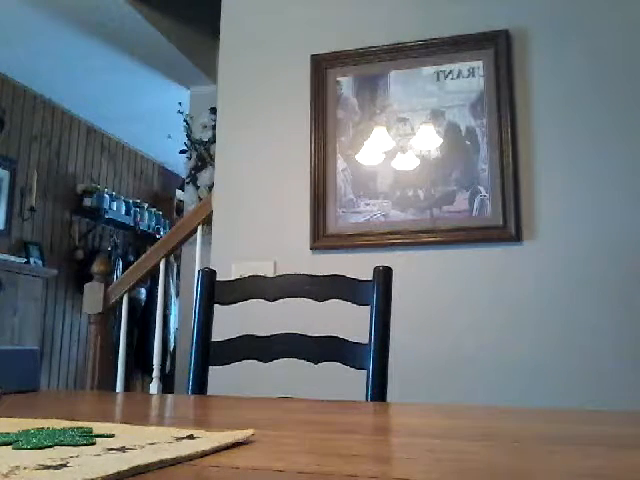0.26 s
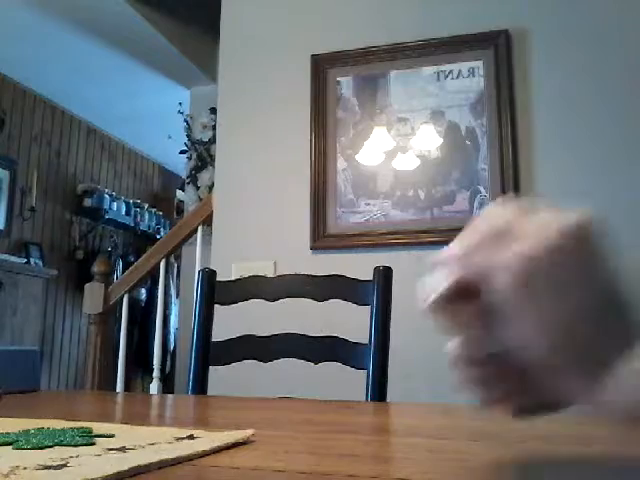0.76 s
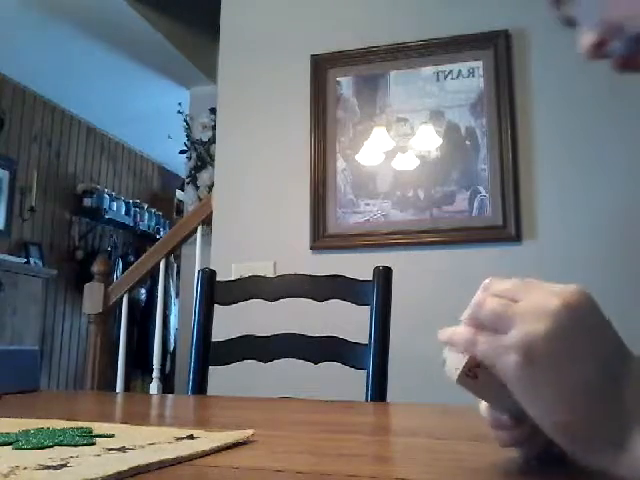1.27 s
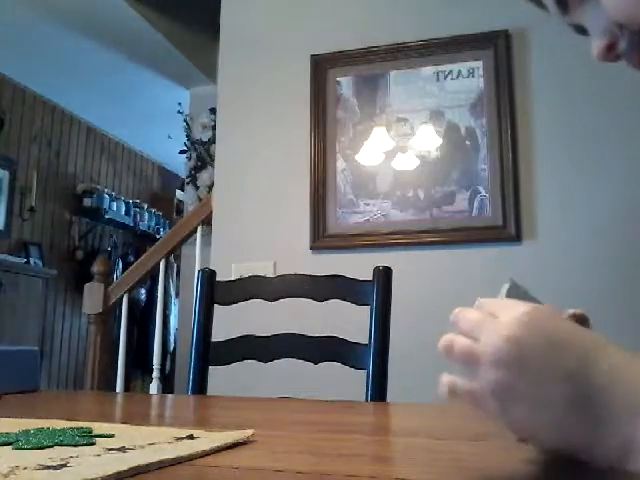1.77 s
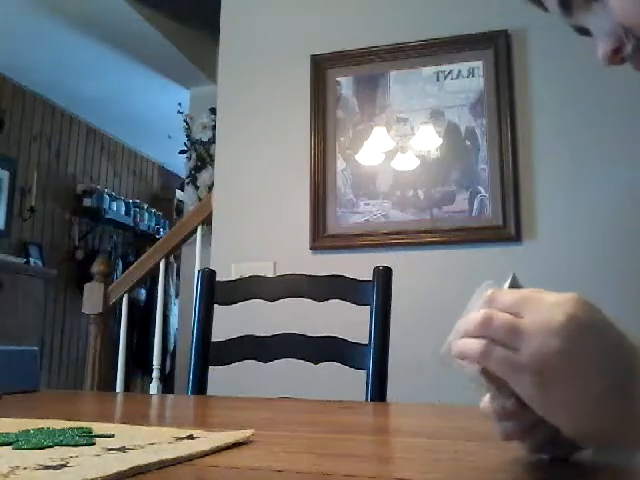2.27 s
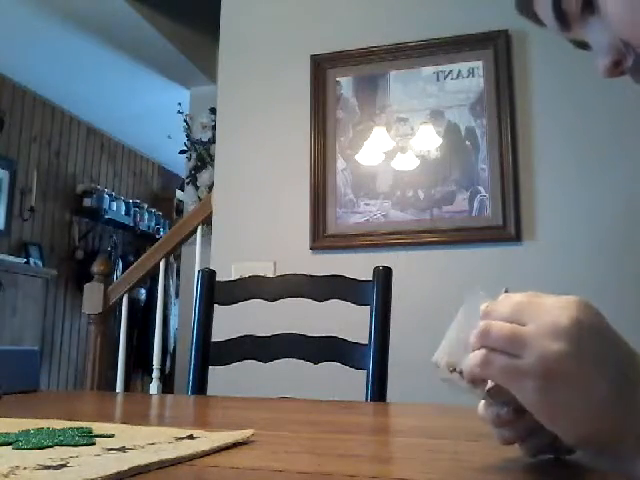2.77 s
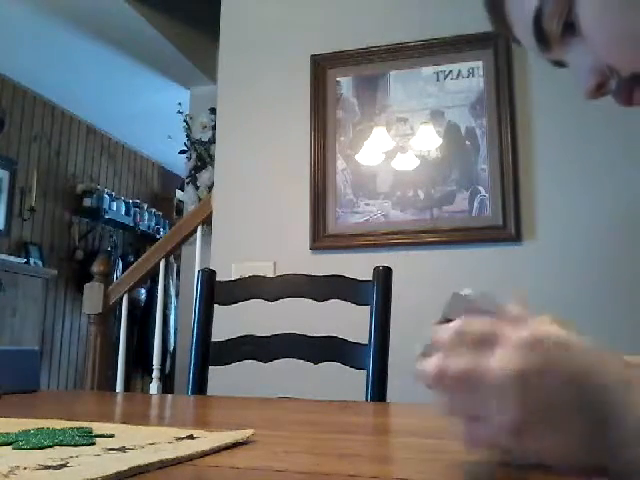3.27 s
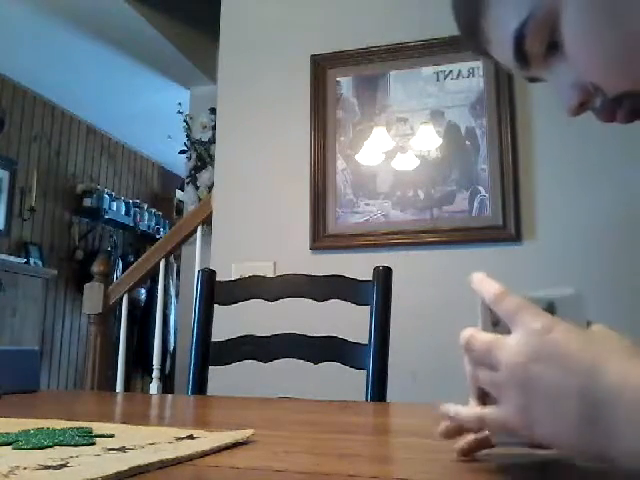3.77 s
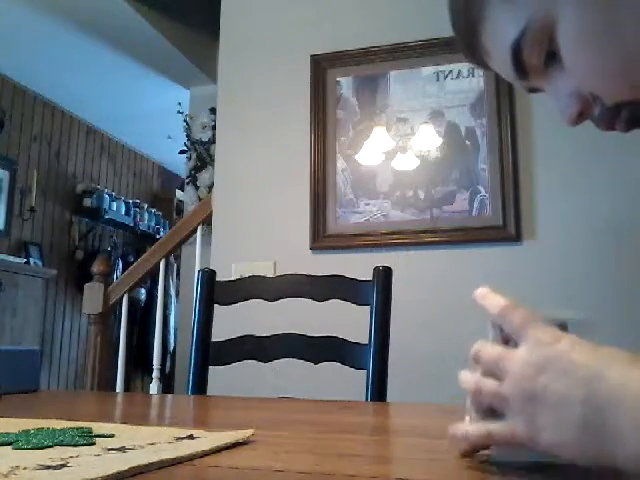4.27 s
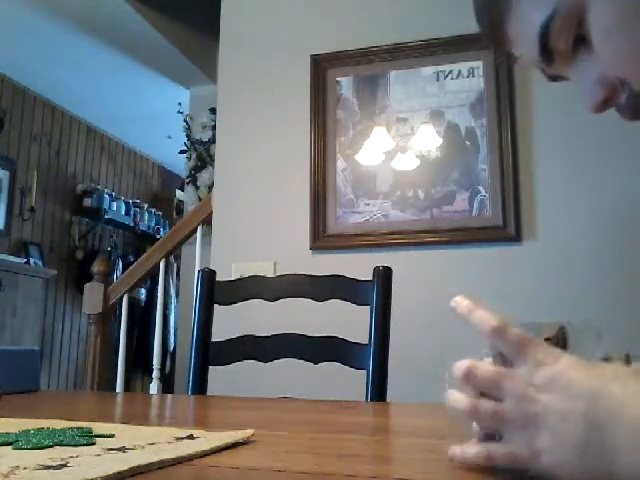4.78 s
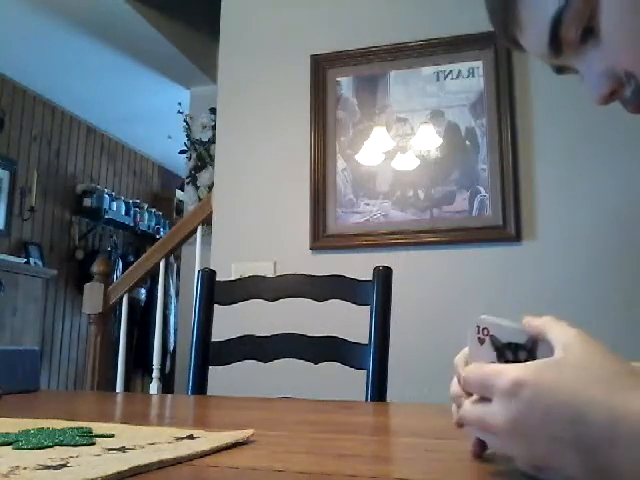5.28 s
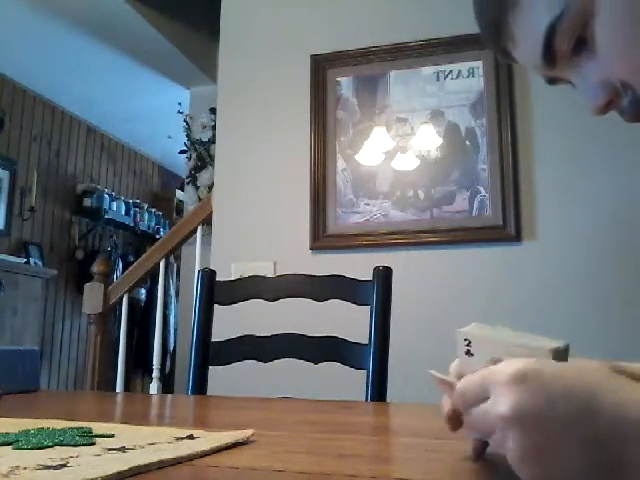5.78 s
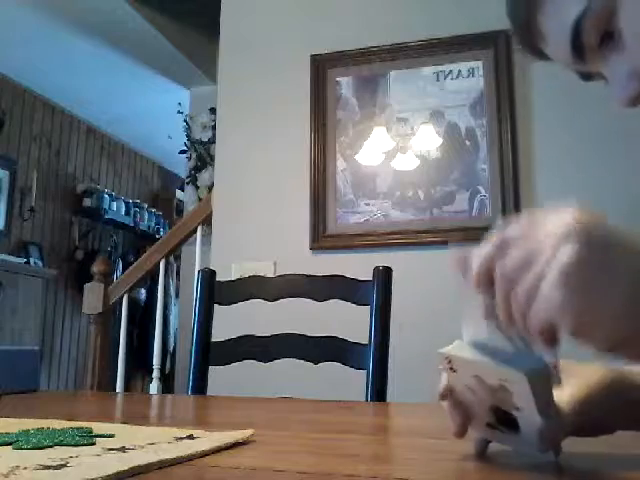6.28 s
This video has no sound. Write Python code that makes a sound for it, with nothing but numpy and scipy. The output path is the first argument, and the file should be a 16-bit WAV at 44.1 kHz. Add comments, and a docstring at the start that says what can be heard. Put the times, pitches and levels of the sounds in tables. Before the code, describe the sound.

Close, dry card handling at a wooden table indoors: scattered light ticks, a low soft bump with friction hiss, then a fast riffle swelling to sharp bright snaps. Brief papery swishes follow, then a few edge taps and two loud clattering knocks with woody ring as the deck is squared. It ends almost silent, with slight room reverberation, low mains hum and microphone hiss.

```python
"""Cards flick off a thumb in quick runs, each slapping the pile a moment later; at a wooden table in a quiet room
forearms land, cards slide and swish, and the deck is tapped square and briefly rubbed on the wood.
Flicks, taps and thumps are short bursts and pushes through resonances; slides and swishes are coloured noise
with moving levels. The room answers in decaying noise; a mains hum and the microphone's hiss lie under it all."""
import sys
import numpy as np
from scipy import signal
from scipy.fft import rfft, irfft, next_fast_len
from scipy.io import wavfile
from scipy.ndimage import map_coordinates

SR = 44100
rng = np.random.default_rng(int(sys.argv[2]) if len(sys.argv) > 2 else 0)


def file_out(sig):
    """Save sig as 16-bit WAV at sys.argv[1]."""
    # one column per channel
    cols = np.atleast_2d(sig).T
    # limit, then scale
    lim = np.clip(cols, -1, 1)
    pcm = np.round(lim * 32767).astype(np.int16)
    wavfile.write(sys.argv[1], SR, pcm)


N = 287973

# resonances of the table top: (f/Hz, width/Hz, level/dB)
TABLE_MODES = [(117, 18, -9), (201, 34, 0), (259.8, 57, -3), (367, 49, 1), (483, 20, -6.5), (656, 36, 5),
               (900, 33, -32.5)]


def amp(db):
    """Decibels to a linear factor."""
    return 10 ** (np.asarray(db) / 20)


def unit(x):
    """Scales to an rms of 1."""
    return x / np.sqrt(np.mean(x ** 2) + 1e-20)


def peaked(x):
    """Scales to a peak of 1."""
    return x / (np.max(np.abs(x)) + 1e-20)


def along(points, hz):
    """Reads a curve of (f/Hz, value) points on a log frequency axis."""
    f, v = np.transpose(points)
    return np.interp(np.log(hz + 1), np.log(f + 1), v)


def curves(rows):
    """One value per sample for each column after the time."""
    s, *cols = np.transpose(rows)
    return [np.interp(np.arange(N) / SR, s, c) for c in cols]


def wobble(rate):
    """A smooth random curve, rate knots a second."""
    knots = rng.standard_normal(int(N * rate / SR) + 4)
    return map_coordinates(knots, [np.arange(N) * rate / SR])


def filtered(x, response):
    """Applies a complex response of frequency."""
    n = x.shape[-1]
    m = next_fast_len(n + SR // 4)
    return irfft(rfft(x, m) * response(np.fft.rfftfreq(m, 1 / SR)), m)[..., :n]


def modes(rows):
    """Causal response of resonances (f/Hz, width/Hz, level/dB), with alternating signs."""
    def response(f):
        total = 0
        for k, (centre, width, db) in enumerate(rows):
            damping = 1j * f * width
            total = total + (-1) ** k * amp(db) * damping / (centre * centre - f * f + damping)
        return total
    return response


def causal(gain):
    """The same gain with no ringing before the blow (folded cepstrum)."""
    def response(hz):
        cep = irfft(np.log(gain(hz) + 1e-6))
        half = len(cep) // 2
        cep[1:half] *= 2
        cep[half + 1:] = 0
        return np.exp(rfft(cep))
    return response


def noise(colour):
    """Steady noise shaped by (f/Hz, level/dB) points, at an rms of 1."""
    return unit(filtered(rng.standard_normal(N), lambda hz: amp(along(colour, hz))))


def add(track, s, sound):
    """Mixes a sound in at s seconds."""
    track[round(s * SR):][:len(sound)] += sound


def snap(t, hz, body_db):
    """A freed card edge slips with a quickly dying tone and chatter, over a broader, lower body."""
    chatter = rng.standard_normal(len(t)) * (t / 0.00013) * amp(-60 * t / 0.0057)
    tone = amp(-60 * t / 0.0022) * np.cos(2 * np.pi * hz * t)
    edge = modes([(hz, 1600, 0), (2700, 1500, -8), (12500, 3000, -18), (6200, 400, -6)])
    ring = peaked(filtered(2.6 * tone + 0.4 * chatter, edge))
    burst = rng.standard_normal(len(t)) * amp(-60 * t / 0.015)
    body = peaked(filtered(burst, modes([(1620, 1500, 0), (500, 400, 0.0013)])))
    return ring + amp(body_db) * body


def slap(t, leak_hz=150):
    """A card landing on the pile pushes out the trapped air and cracks brightly."""
    push = (t / 0.00029) * np.exp(-t / 0.00051)
    # a small card radiates no deep bass
    push = filtered(push, lambda f: (1j * f / (leak_hz + 1j * f)) ** 2)
    burst = rng.standard_normal(len(t)) * amp(-60 * t / 0.0025)
    crack = peaked(filtered(burst, modes([(5500, 3600, 0)])))
    return peaked(push) + 1.2 * crack


def flicks(lead_s=0.0008, fall_s=0.0075):
    """Each ring starts lead_s after its listed time; the card slaps the pile fall_s later."""
    # cards leaving the thumb: (t/s, ring level/dB, ring f/Hz)
    releases = [(0.0074, -48.5, 5350), (0.0538, -43.5, 6000), (0.0987, -41.5, 5700), (0.1261, -41, 5630),
                (0.168, -36, 6100), (0.2174, -37, 5970), (0.2698, -49, 5240), (0.3227, -39.5, 5500),
                (0.4219, -46, 4840), (0.4663, -47, 5700), (0.5172, -37, 6100), (0.6669, -40, 5530),
                (0.7108, -45.5, 4350), (0.7322, -43, 6350), (0.8096, -38.5, 4570), (0.8944, -39.5, 5770),
                (0.9284, -40, 5920), (0.9642, -27.5, 6000), (1.0131, -30.5, 5930), (1.2017, -41, 5930),
                (1.2271, -35.5, 6500), (1.2935, -36.5, 6530), (1.3404, -35, 6260), (1.3887, -45, 6100),
                (1.4092, -39.5, 6240), (1.4314, -45, 6300), (2.0153, -46, 5730), (2.0787, -51, 5660),
                (2.1286, -47, 6300), (2.171, -38, 5300), (2.1914, -49, 6740), (2.2069, -46.5, 5160),
                (2.2423, -46.5, 5900), (2.2957, -41, 6200), (2.3341, -41, 6040), (2.3655, -46, 7570),
                (2.3875, -46, 6800), (2.4044, -41, 6200), (2.4184, -43, 5960), (2.4374, -39, 6000),
                (2.4498, -40, 6000), (2.4628, -35.5, 6040), (2.4743, -36, 5610), (2.4992, -37.5, 6300),
                (2.5386, -36.5, 6400), (2.5676, -35.5, 6040), (2.5945, -30.5, 5870), (2.6184, -29, 6150),
                (2.6454, -30, 5940), (2.6788, -24, 6300), (2.7267, -22.5, 6150), (2.7736, -26, 6270),
                (2.8, -26, 5860), (2.818, -24, 5930), (2.8429, -22, 7300), (2.8739, -17.5, 6400),
                (2.9063, -11.5, 6610), (2.9342, -9, 6830), (2.9512, -3.5, 6350), (2.9584, -2.5, 6750),
                (2.9614, -11, 6410), (2.9644, -5, 6050)]
    # fuller when the deck is near the table: (t/s, body level/dB re ring, slap level/dB re ring)
    fullness = [(0.1, -23, -23), (0.6, -19, -12.5), (0.9, -1, -9), (1.25, -14.5, -17), (2.05, -6.5, -20),
                (2.3, -14, -24.5), (2.6, -10.5, -16.5), (2.73, -15.5, -20), (2.83, -4.5, -7.5),
                (2.945, -16.5, -14), (2.965, -9, -26)]
    out, t = np.zeros(N + SR), np.arange(SR // 20) / SR
    bodies_db, slaps_db = curves(fullness)
    for s, db, hz in releases:
        body_db, slap_db = bodies_db[round(s * SR)], slaps_db[round(s * SR)]
        add(out, s + lead_s, amp(db) * snap(t, hz, body_db))
        add(out, s + lead_s + fall_s, amp(db + slap_db) * slap(t))
    return out[:N]


def taps():
    """Rough bursts of contact, mostly quick rattles of card edges, with the table top ringing under them."""
    # deck edges on wood, and a short rub at 5.33 to 5.43 s:
    # (t/s, peak level/dB, full-strength length/ms, tilt/dB per octave, table drive/dB)
    blows = [(3.826, -43, 3.2, 1.5, 11), (4.015, -24.5, 6.3, -4.5, 1), (4.019, -15, 5.3, -1, 10.5),
             (4.158, -24.5, 0.88, -2.5, 4), (4.1813, -22, 0.33, 5, 4), (4.186, -37, 1.3, -3, 3.5),
             (4.467, -47, 1.6, -10.5, 6.5), (4.664, -9.5, 11.8, 1.5, 6), (4.677, -10, 5.47, -1, 9.5),
             (4.694, -27.5, 1.5, -7.5, -5), (4.735, -12, 5.5, 3, 11), (4.741, -21.5, 10.3, -5, 5.5),
             (4.7963, -22, 0.41, 0.6, 8.5), (4.803, -22.5, 1, -4.5, -7), (5.2, -35.5, 2.93, -8, 9),
             (5.332, -51.5, 20, -7, 8), (5.351, -48, 32, -7, 8.5), (5.39, -53.5, 40, -9, 11),
             (5.606, -51.5, 2.6, -3.5, 7)]
    # colour of the contact: (f/Hz, level/dB)
    contact_colour = [(30, -43.5), (130, -16), (250, -1), (480, 1.5), (700, 2.5), (1500, 2), (5200, 1),
                      (6800, -7), (7800, -32), (15000, -55)]
    out, t = np.zeros(N + SR), np.arange(SR // 4) / SR
    for s, db, length_ms, tilt_db, wood_db in blows:
        over = np.maximum(t - length_ms / 1000, 0)
        grains = np.sign(rng.standard_normal(len(t))) * amp(4 * rng.standard_normal(len(t)))
        burst = grains * amp(-60 * over / 0.005)
        contact = filtered(burst, causal(lambda hz: amp(along(contact_colour, hz))))
        edges = filtered(contact, causal(lambda hz: amp(tilt_db * np.log2((hz + 100) / 1000))))
        wood = amp(wood_db) * filtered(contact, modes(TABLE_MODES))
        add(out, s, amp(db) * peaked(edges + wood))
    return out[:N]


def thumps():
    """A soft push of flesh rings the table's low modes and sways its frame at 42 Hz."""
    # forearms and wrists settling on the table: (t/s, level/dB of the ringing peak)
    landings = [(0.797, -25.5), (0.818, -29), (0.839, -32.5), (0.854, -37), (0.883, -37.5), (0.99, -34.5),
                (1.017, -43), (1.041, -30.5), (1.405, -50.5), (1.838, -55), (3.812, -51), (4.173, -44),
                (4.361, -58)]
    out, t = np.zeros(N + SR), np.arange(SR // 2) / SR
    for s, db in landings:
        push = (t / 0.0008) ** 3 * np.exp(-t / 0.00057)
        # each landing excites the modes in a slightly different balance
        varied = [(hz, width, level + rng.normal(0, 1.5)) for hz, width, level in TABLE_MODES]
        sway = amp(-24 - 60 * t / 0.21) * np.sin(2 * np.pi * 42 * t)
        add(out, s, amp(db) * (peaked(filtered(push, modes(varied))) + sway))
    return out[:N]


def slides():
    """Sliding cards and skin make a fine, flickering friction hiss and a lumpy rumble in the wood."""
    # cards and skin sliding: (t/s, hiss level/dB, table rumble level/dB)
    strokes = [(0.0, -74, -72), (0.78, -68.5, -73.5), (0.83, -50.5, -64), (0.92, -53, -53.5),
               (0.964, -58, -48), (1.1, -54, -50.5), (1.2, -58, -62.5), (1.46, -67, -67),
               (1.62, -80, -80.5), (2.36, -70, -68.5), (2.44, -58.5, -59.5), (2.72, -69.5, -57.5),
               (2.9, -51, -49.5), (3.1, -51, -62.5), (3.58, -62.5, -65), (3.7, -53, -61.5),
               (3.83, -53.5, -55.5), (3.92, -64, -67.5), (4.65, -73.5, -74.5), (5.0, -63, -64.5),
               (5.55, -76, -79.5), (6.53, -75, -72)]
    # colour of the hiss: (f/Hz, level/dB per Hz)
    hiss_colour = [(300, -38), (500, -8.5), (1400, -11.5), (3000, -12), (4800, -8), (6200, -2),
                   (7600, -8.5), (10000, -12), (13000, -12.5), (14300, -38.5), (15000, -63.5)]
    # colour of the rumble: (f/Hz, level/dB per Hz)
    rumble_colour = [(18, -55), (30, -16), (167, -0.5), (259, -5), (300, -1.5), (480, -10), (1000, -27.5),
                     (1300, -56), (2200, -120)]
    hiss_db, rumble_db = curves(strokes)
    grain = amp(0.58 * wobble(40) + 1.8 * wobble(300))
    lumps = amp(1.8 * wobble(45))
    hiss = amp(hiss_db) * unit(grain * noise(hiss_colour))
    rumble = amp(rumble_db) * unit(lumps * noise(rumble_colour))
    return hiss, rumble


def hollow():
    """A hollow ring in the hiss, perhaps air between cupped hands: noise through three resonances."""
    # while the ring is heard: (t/s, level/dB)
    cupped = [(.86, -62), (.93, -57), (1.0, -62), (1.055, -54.5), (1.19, -60), (1.27, -71), (1.38, -68)]
    # resonances of the hollow: (f/Hz, width/Hz, level/dB)
    cavity = [(1950, 320, -5.5), (3800, 190, 3), (6040, 620, -4)]
    t = np.arange(N) / SR
    held = (t > cupped[0][0]) & (t < cupped[-1][0])
    return held * amp(curves(cupped)[0]) * unit(filtered(rng.standard_normal(N), modes(cavity)))


def swishes():
    """Short bright strokes of card on card that swell and stop: flickering noise in bell-shaped bursts."""
    # quick card strokes: (middle t/s, half length/s, level/dB at the middle)
    bursts = [(0.847, 0.026, -51), (3.247, 0.028, -52.5), (5.829, 0.022, -60), (6.417, 0.018, -64.5)]
    # colour of the strokes: (f/Hz, level/dB per Hz)
    stroke_colour = [(800, -45), (2000, -6), (4000, -14), (6400, 0.5), (8500, -8), (13000, -10),
                     (14500, -20), (15500, -80)]
    t = np.arange(N) / SR
    swell = sum(amp(db) * np.exp(-((t - s) / half) ** 2) for s, half, db in bursts)
    return swell * unit(amp(3.5 * wobble(200)) * noise(stroke_colour))


def room(x, first_s):
    """Each frequency of the walls' answer dies at its own speed; it never repeats exactly."""
    # decay of the room: (f/Hz, time to fall 60 dB/s)
    decay = [(150, 0.27), (400, 0.65), (1000, .42), (3000, 0.45), (7000, 0.32), (13000, 0.098)]
    wet, hop = np.zeros(N + 2 * SR), SR // 8
    for start in range(0, N, hop):
        # every eighth of a second gets a fresh tail of equal energy
        hz, t, z = signal.stft(rng.standard_normal(SR // 2), SR, nperseg=256)
        fade = amp(-60 * t / along(decay, hz)[:, None])
        tail = signal.istft(z * fade, SR, nperseg=256)[1]
        tail = tail / np.linalg.norm(tail)
        add(wet, start / SR + first_s, signal.fftconvolve(x[start:start + hop], tail))
    return wet[:N]


def hum():
    """Mains hum: low sines wavering in level and phase."""
    # hum partials: (f/Hz, level/dB rms about which each wavers)
    partials = [(119.5, -77.5), (239, -85.5)]
    t, out = np.arange(N) / SR, np.zeros(N)
    for hz, db in partials:
        level = np.sqrt(2) * amp(db + 2.5 * wobble(8))
        out += level * np.sin(2 * np.pi * hz * t + 0.8 * wobble(7))
    return out


def room_tone(level_db=-72.5):
    """Room tone and microphone hiss: coloured noise whose level drifts slightly."""
    # colour of the quiet: (f/Hz, level/dB per Hz)
    quiet_colour = [(18, -27), (45, -33), (100, -25.5), (140, -15), (250, -9), (400, -12), (800, -19),
                    (1700, -20.5), (4500, -22.5), (6200, -23), (8000, -25), (14300, -17), (14900, -70.5)]
    return amp(level_db + 0.6 * wobble(3)) * noise(quiet_colour)


def scene():
    """Mixes the direct sounds, the room's answer and the quiet bed."""
    cards, knocks, arms = flicks(), taps(), thumps()
    hiss, rumble = slides()
    hiss = hiss + swishes()
    # the table sends mostly its duller sound to the walls
    spread = filtered(knocks, lambda hz: 1 / (1 + 1j * hz / 3500))
    send = amp(-11.5) * cards + amp(-5.5) * spread + amp(-8.5) * arms + amp(-12) * hiss
    wet = room(send, first_s=0.004)
    direct = cards + knocks + arms + hiss + rumble + hollow()
    return (direct + wet + hum() + room_tone())[None]


def record(dry, treble_hz=14000, top_hz=15600):
    """The small microphone loses the top treble; nothing is kept above the band limit."""
    return filtered(dry, lambda hz: (hz < top_hz) / (1 + (hz / treble_hz) ** 8))


dry = scene()
out = record(dry)
file_out(out)
```